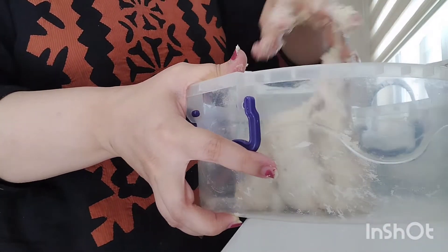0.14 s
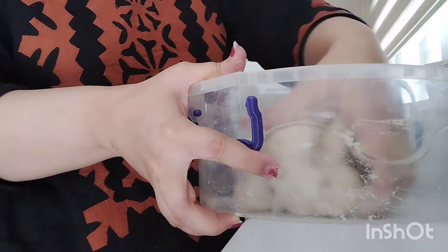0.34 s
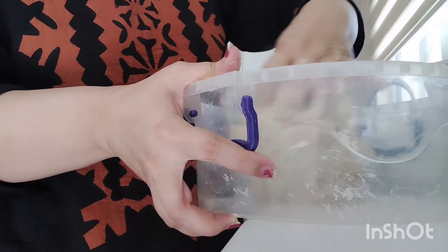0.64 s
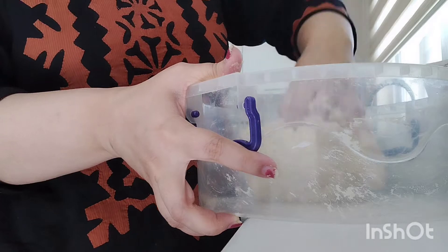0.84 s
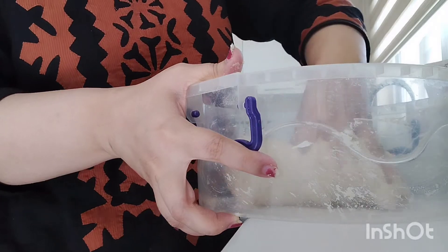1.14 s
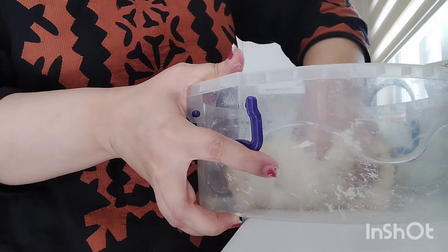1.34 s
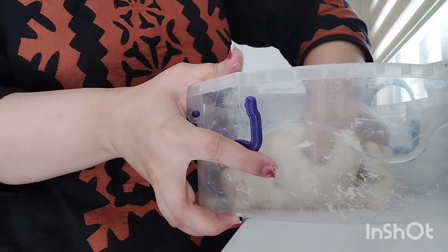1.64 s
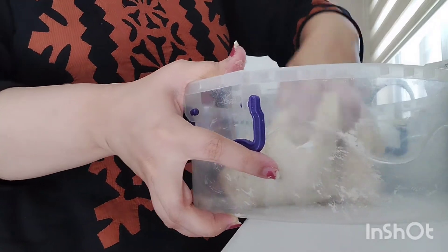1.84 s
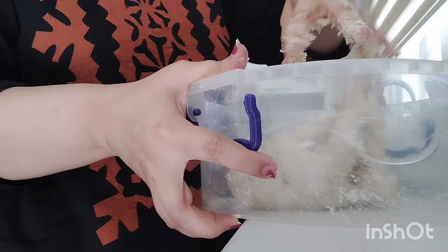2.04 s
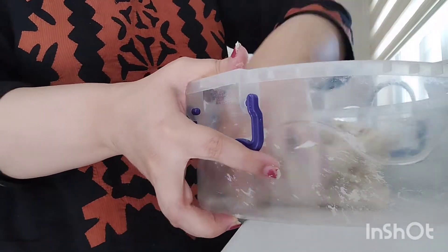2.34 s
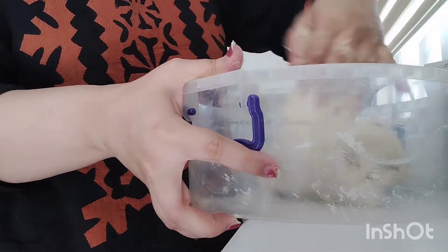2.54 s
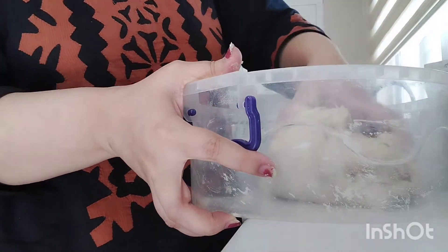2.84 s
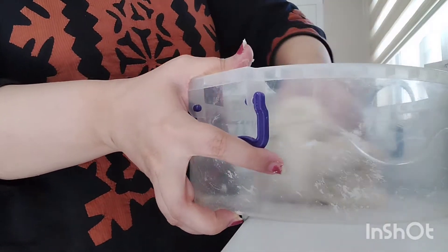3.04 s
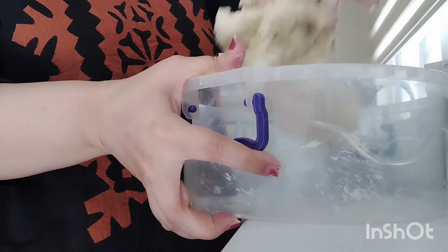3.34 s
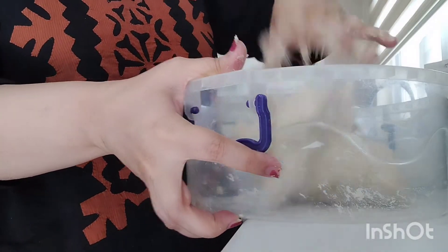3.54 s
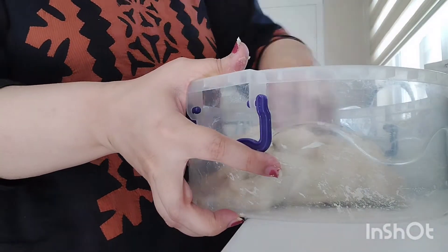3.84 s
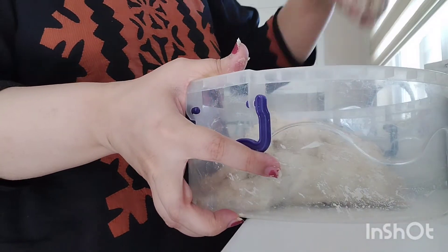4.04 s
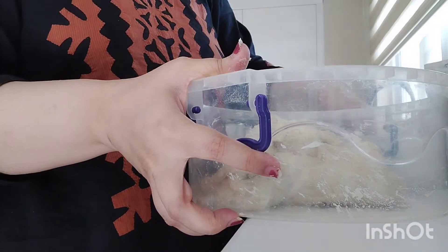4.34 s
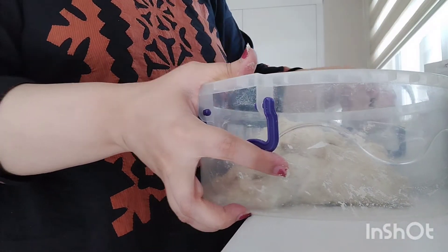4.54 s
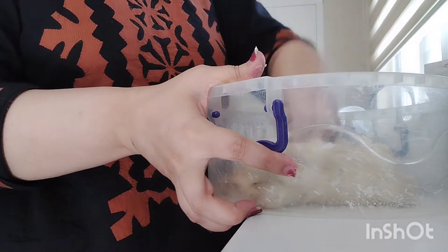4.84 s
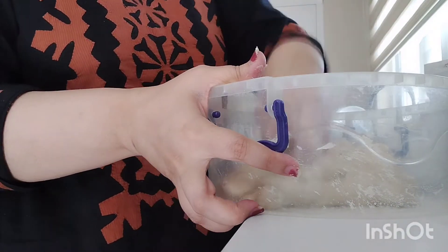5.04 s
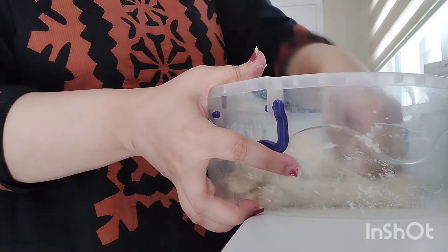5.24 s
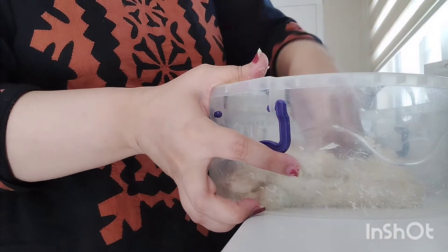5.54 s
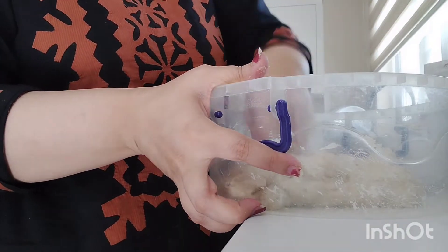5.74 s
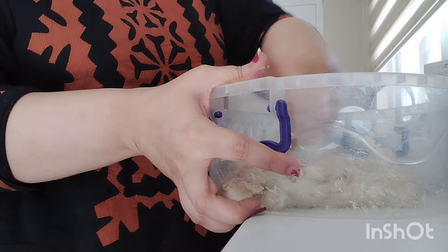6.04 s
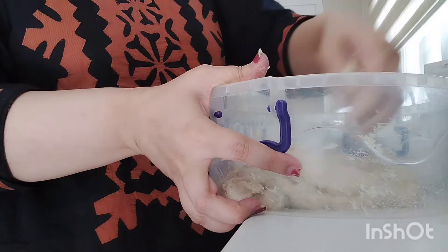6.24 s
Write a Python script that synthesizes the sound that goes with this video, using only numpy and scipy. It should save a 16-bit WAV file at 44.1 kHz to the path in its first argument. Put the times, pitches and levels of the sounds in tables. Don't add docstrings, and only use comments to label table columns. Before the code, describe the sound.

A steady low fan hum with a quick, soft shaft throb runs throughout, close in a small hard kitchen. Dough rubs thin plastic at the start, with light knocks at 0.1 s and a firm hollow knock at 0.37 s, followed by soft settling bumps. From 0.8 to 1.8 s it is quieter: faint thin air whistles and a tiny wet squeak at 1.1 s. Drags return at 1.9 s, and the loudest sharp plastic whack lands at 2.26 s. A pop at 2.9 s leads to a tight burst of knocks and rubbing around 3.2-3.6 s. After a lull, a dull bump comes at 4.3 s and a rub at 4.6 s. From 4.8 s gritty floury scuffs flicker, a low rocking rumble rises around 4.9 s, and knocks with bright pops strike at 5.4 s. Lighter taps at 5.8, 6.0 and 6.35 s continue to the end.

```python
import sys
import numpy as np
from scipy import signal
from scipy.fft import rfft, irfft
from scipy.io import wavfile
from scipy.ndimage import uniform_filter1d

SR = 44100
rng = np.random.default_rng(int(sys.argv[2]) if len(sys.argv) > 2 else 0)


def int16_out(signal):
    q = np.round(np.clip(np.atleast_2d(signal).T, -1, 1) * 32767)
    wavfile.write(sys.argv[1], SR, q.astype(np.int16))


def how_loud(loudness_db):
    steps = np.asarray(loudness_db, float) / 20
    return 10 ** steps


N = 281799


def along(table, hz):
    f, v = np.transpose(table)
    return np.interp(np.log(np.maximum(hz, 1)), np.log(f), v)


def unit(x):
    return x / np.sqrt(np.mean(x ** 2))


def peak(x):
    return x / np.max(np.abs(x))


def band(x, low_hz, high_hz):
    edges = [low_hz, min(high_hz, 0.45 * SR)]
    return signal.sosfilt(signal.butter(2, edges, "bandpass", fs=SR, output="sos"), x)


def colour(x, table):
    hz = np.fft.rfftfreq(len(x), 1 / SR)
    return irfft(rfft(x) * how_loud(along(table, hz)), len(x))


def walk(rate):
    k = int(SR / rate)
    steps = np.repeat(rng.standard_normal(N // k + 1), k)
    return 2.0 * uniform_filter1d(uniform_filter1d(steps, k), k)[:N]


def held_noise(t, hold):
    return np.repeat(rng.standard_normal(len(t) // hold + 1), hold)[:len(t)]


def decay(t, t60_s):
    return np.exp(-np.log(1000) * t / t60_s)


def ring(modes, t, gains=1, detune=1):
    hz, db, t60_s = np.transpose(modes)[:, :, None]
    tones = np.sin(2 * np.pi * hz * detune * t) * decay(t, t60_s)
    return np.sum(gains * how_loud(db) * tones, axis=0)


def add(out, s, x, pan_db):
    i = int(s * SR)
    x = x[..., :N - i]
    out[:, i:i + x.shape[-1]] += x * how_loud(np.array([[pan_db], [-pan_db]]) / 2)


# (pitch [Hz], level [dB per Hz])
FAN_AIR = [(13, -38), (22, -2), (31, -9.5), (44, -8.5), (82, -7), (184, -23.5), (263, -22.5), (294, -16),
           (328, -25), (376, -20), (585, -30.5), (861, -30), (2320, -54), (6600, -64), (7900, -69.5),
           (11200, -69.5), (13500, -61.5), (15500, -59.5)]
# (pitch [Hz], likeness [0-1])
FAN_ALIKE = [(60, 1), (150, 0.78), (400, 0.9), (1000, 0), (3000, 0), (9000, 0)]
# (pitch [Hz], left minus right [dB])
FAN_BALANCE = [(30, -3), (125, -0.5), (500, -3.5), (2000, -3.5), (8000, -3), (14000, 4)]


def fan():
    level_db, shaft_hz, shaft_db = -36.5, 16.65, -35
    t, hz = np.arange(N) / SR, np.fft.rfftfreq(N, 1 / SR)
    mid, side = rfft(rng.standard_normal((2, N))) * how_loud(along(FAN_AIR, hz))
    alike = np.clip(along(FAN_ALIKE, hz), 0, 1)
    pan = how_loud(along(FAN_BALANCE, hz) / 2)
    left = (np.sqrt(1 + alike) * mid + np.sqrt(1 - alike) * side) * pan
    right = (np.sqrt(1 + alike) * mid - np.sqrt(1 - alike) * side) / pan
    air = irfft(np.array([left, right]), N)

    top = np.array([colour(v, [(7000, -60), (8000, 8)]) for v in air])
    breath_db = 0.25 * walk(2.73) + 0.5 * walk(18.0)
    air = air + top * (how_loud(breath_db) - 1)
    air = air / np.std(air.mean(axis=0)) * how_loud(level_db + 0.42 * walk(2.77))

    turn = 2 * np.pi * shaft_hz * t - 0.2 + 0.15 * walk(1.5)
    throb = np.sqrt(2) * how_loud(shaft_db + 1.0 * walk(1.3)) * np.cos(turn)
    low_hz, high_hz = 62, 105
    edges = [(low_hz / 0.89, -60), (low_hz, 0), (high_hz, 0), (high_hz * 1.75, -60)]
    bass = colour(air.mean(axis=0), edges)
    swell = unit(how_loud(5.5 * np.cos(turn + 1.0)))
    return air + bass * (swell - 1) + throb


# (pitch [Hz], level [dB], fade by 60 dB [s])
TUB = [(345, -2.5, 0.059), (460, 1.5, 0.031), (595, 2, 0.025), (669, 2.5, 0.013), (870, -6.5, 0.039),
       (1055, 4.5, 0.021), (1308, 1, 0.01), (1560, -31, 0.039), (1713, -26, 0.066), (2302, -15, 0.033),
       (2970, -25.5, 0.019), (3600, -37, 0.14), (4200, -33.5, 0.075), (5360, -43, 0.0074)]
# (pitch [Hz], level [dB per Hz])
RUSTLE = [(300, 2), (1500, 15.5), (2300, 8.5), (4000, 0), (6500, -5.5), (8000, -13.5), (11000, -15),
          (13500, -8), (16000, -20)]
# (middle time [s], level [dB], half length [s], dryness [dB])
STROKES = [(0.06, -42, 0.093, -0.5), (0.597, -48, 0.29, 0.5), (0.93, -53, 0.4, -3.5), (1.45, -65, 0.26, 3),
           (1.868, -43, 0.17, -2.5), (2.3, -44, 0.036, -2), (2.414, -39, 0.12, -1), (2.683, -50.5, 0.5, 0),
           (3.205, -41, 0.2, -1.5), (3.314, -34, 0.11, -6), (3.592, -35.5, 0.064, -1.5),
           (4.572, -37.5, 0.1, 0), (4.942, -51.5, 0.23, -3), (5.408, -42.5, 0.094, -0.5),
           (5.962, -50.5, 0.82, 1.5), (6.38, -49.5, 0.064, 7)]


def drag():
    rest_db, rustle_db = -88, -14
    t = np.arange(N) / SR
    pull, rub = how_loud(rest_db), how_loud(rest_db)
    for s, db, half_s, dry_db in STROKES:
        stroke = how_loud(db) * np.exp(-((t - s) / half_s) ** 2)
        pull = pull + stroke
        rub = rub + stroke * how_loud(dry_db)
    grain_db = 4.4 * np.minimum(rng.exponential(size=N), 6.0) + 1.6 * walk(70)
    grains = rng.standard_normal((2, N)) * how_loud(grain_db)
    walls = unit(signal.fftconvolve(grains[0], ring(TUB, t[:SR // 10]))[:N]) * how_loud(-8.5)
    dry = np.array([unit(colour(grains[0] + k * 0.56 * grains[1], RUSTLE)) for k in (1, -1)])
    return pull * walls * how_loud(np.array([[-1.5], [1.5]])) + rub * dry * how_loud(rustle_db)


# (pitch [Hz], level [dB], fade by 60 dB [s])
COUNTER = [(47.3, -6, 0.068), (95.6, 9, 0.037), (132.1, -11, 0.14), (183, 0.5, 0.033)]
# (pitch [Hz], level [dB per Hz])
CRACK = [(300, -33), (1500, 15.5), (2300, 13.5), (4000, 2), (6500, -2), (8000, -26), (11000, -31),
         (13500, -22), (16000, -32)]
# (pitch [Hz], left minus right [dB])
WALL_BALANCE = [(400, 1.5), (620, -10.5), (1050, -2)]


def blow(out, s, db, spot_hz, crack_db, thud_db, push_s):
    detune = 0.012
    t, hz = np.arange(SR // 5) / SR, np.array(TUB)[:, :1]
    chance = rng.standard_normal((3, len(TUB), 1))
    hiss = rng.standard_normal((2, len(t)))
    shift = 1 + detune * chance[1]

    far_db = -12.0 * np.abs(np.log2(hz / spot_hz)) * (hz < 1500)
    sign = np.sign(chance[2] + 0.53 + 9 * (hz < 1200))
    near = how_loud(far_db + 2.15 * chance[0]) * sign

    push = np.hanning(int(push_s * SR) + 3)
    balance_db = along(WALL_BALANCE, hz) / 2
    sides = [ring(TUB, t, near * (hz < 1500) * how_loud(k * balance_db), shift) for k in (1, -1)]
    pushed = np.array([np.convolve(v, push)[:len(t)] for v in sides])
    low = -band(pushed, spot_hz / 2.0, 5000)
    low = low / np.max(np.abs(low.mean(axis=0)))
    high = peak(ring(TUB, t, near * (hz > 1500), shift))

    grit = how_loud(6.9 * held_noise(t, 64))
    crack_shape = np.exp(-t / 0.0019) + 0.076 * grit * np.exp(-t / 0.014)
    crack_shape = crack_shape * np.minimum(t / push_s, 1)
    crack = peak(np.array([colour(v, CRACK) for v in hiss]) * crack_shape)

    shaking = hiss[0] * grit * (1 - np.exp(-t / 0.0032)) * np.exp(-t / 0.0022)
    wobble = peak(signal.fftconvolve(shaking, low.mean(axis=0))[:len(t)])
    wobble = wobble * how_loud(along(WALL_BALANCE, spot_hz) * np.array([[0.5], [-0.5]]))
    thud = peak(ring(COUNTER, t) * (1 - np.exp(-t / 0.012)))

    add(out, s - 0.0005, how_loud(db) * (low + 600 * push_s * wobble), 0)
    add(out, s - 0.0005, how_loud(db + crack_db) * (0.69 * high + 2.37 * crack), -4.5)
    add(out, s + 0.003, how_loud(db + thud_db + 7.0) * thud, -5.5)


# (time [s], peak level [dB], strongest wall tone [Hz], crack re ring [dB], counter thud re ring [dB])
BLOWS = [(0.0955, -21.5, 445, -21, -4), (0.157, -27, 626, -14.5, -31), (0.367, -12.5, 660, -11, -10),
         (1.884, -26.5, 384, -20.5, -4), (2.26, -3.5, 900, -21, -19.5), (2.936, -27.5, 595, -18.5, -25),
         (3.281, -28.5, 1200, -12, 1), (3.3051, -10.5, 527, -15.5, -16), (3.3217, -14, 790, -11, -12.5),
         (3.362, -21, 500, -30, -19), (3.51, -30, 474, -5, -34), (3.513, -33, 1080, -17, -31),
         (3.556, -29.5, 325, -5, 1), (3.601, -30.5, 800, -13, -6), (4.335, -31.5, 546, -38, 0.5),
         (5.398, -21, 960, -13, -10.5), (5.823, -23.5, 497, -27, -8.5), (6.035, -26.5, 1050, -19, 1.5),
         (6.098, -30.5, 1010, -14.5, -5), (6.345, -27.5, 860, -19, -8)]
# (time [s], peak level [dB], strongest wall tone [Hz], crack re ring [dB])
BUMPS = [(0.403, -32, 533, -21), (0.42, -39, 600, -30), (0.445, -29, 564, -32), (0.345, -36, 500, -22),
         (0.357, -40, 500, -11), (0.594, -32, 870, -45), (0.622, -32.5, 307, -35), (0.71, -34.5, 424, -21),
         (0.797, -39, 594, -23), (1.991, -31.5, 605, -22), (2.0226, -31.5, 600, -19), (2.3, -27, 600, -16),
         (2.331, -27.5, 640, -20), (2.338, -26.5, 800, -23), (2.342, -25.5, 935, -26),
         (2.409, -38, 600, -16), (2.466, -34, 603, -18), (2.29, -26, 400, -19), (2.263, -16.5, 1180, -30),
         (2.414, -48, 330, -37), (2.431, -36, 1050, -30), (2.515, -45, 420, -7), (3.184, -32, 960, -20),
         (3.167, -32, 870, -21), (3.178, -29, 450, -34), (3.261, -27, 385, -27), (3.377, -29, 1040, -23),
         (3.562, -27.5, 323, -17), (3.61, -27, 330, -25), (5.153, -33, 303, -22), (5.389, -23, 366, -45),
         (5.372, -34, 900, -14), (5.815, -28, 420, -40), (6.03, -30.5, 400, -37), (0.1, -53, 300, -27),
         (0.37, -19.5, 1120, -34), (3.299, -35.5, 350, 1), (5.404, -22.5, 900, -24), (5.411, -27, 990, -20),
         (5.422, -39, 1000, -24), (2.247, -25.5, 820, -30), (6.042, -34, 1000, -23), (0.385, -54, 590, -22)]
# (time [s], peak level [dB])
TICKS = [(0.346, -39), (1.305, -43.5), (1.521, -41.5), (1.918, -44), (3.313, -20.5), (3.33, -27),
         (3.34, -26.5), (3.376, -40), (3.353, -39), (4.318, -46.5), (5.2539, -33.5), (5.72, -49)]


def knocks():
    out = np.zeros((2, N))
    hard_push_s, soft_push_s = 0.0005, 0.00084
    for row in BLOWS:
        blow(out, *row, hard_push_s)
    for row in BUMPS:
        blow(out, *row, thud_db=-15.5, push_s=soft_push_s)
    for s, db in TICKS:
        blow(out, s, db, spot_hz=900, crack_db=-9, thud_db=-23, push_s=hard_push_s)
    return out


# (time [s], peak level [dB], pitch [Hz], fade by 60 dB [s])
POPS = [(0.143, -52, 4000, .02), (0.355, -50, 13800, .01), (0.434, -53, 5600, .015),
        (0.484, -54, 5600, .01), (0.484, -56, 12500, .01), (0.641, -51, 3730, .05), (0.66, -58, 3850, .04),
        (0.652, -49, 2100, .03), (0.727, -60, 2780, .03), (0.797, -55, 4670, .03),
        (1.742, -51, 3130, 0.026), (1.757, -59, 4900, .02), (2.042, -51, 2280, .02), (2.79, -61, 6000, .03),
        (2.925, -36.5, 2000, 0.057), (3.046, -53, 3450, .02), (3.058, -50, 2340, 0.016),
        (3.07, -56, 5500, .02), (3.148, -50, 2280, 0.033), (3.15, -57, 2900, .03), (3.179, -45, 2180, .03),
        (3.181, -55, 3600, .02), (3.236, -50, 2300, .03), (3.262, -50, 2300, .03), (3.51, -53, 9000, .02),
        (3.511, -52, 13400, .02), (3.305, -48, 13500, .015), (5.153, -55, 3600, 0.038),
        (5.258, -43, 3440, .04), (5.376, -33, 4200, 0.056), (5.4, -37, 5600, 0.033),
        (4.853, -50, 2180, .03), (0.367, -29.5, 3870, 0.0084), (0.395, -48, 3300, .04),
        (5.399, -33.5, 1960, 0.024), (5.722, -37, 2080, 0.037), (3.327, -29, 1980, 0.022),
        (6.371, -50, 2300, .03), (6.385, -55, 9000, .02), (4.26, -55, 3300, .03), (4.538, -52, 3300, .04),
        (4.6, -53, 4100, 0.096)]


def pops():
    out, t = np.zeros((2, N)), np.arange(SR // 10) / SR
    for s, db, hz, t60_s in POPS:
        noise = band(rng.standard_normal((2, len(t))), hz / 1.14, hz * 1.11)
        burst = noise * np.minimum(t / 0.00073, 1) * decay(t, t60_s)
        pair = burst[0] + 0.69 * burst[1] * np.array([[1], [-1]])
        add(out, s - 0.001, how_loud(db) * peak(pair), -3.0)
    return out


# (start time [s], length [s], level [dB], start pitch [Hz], end pitch [Hz])
HISSES = [
    (0.79, 0.27, -70, 4750, 4470),
    (1.498, 0.34, -75, 4800, 4900),
]


def hisses():
    t, out = np.arange(N) / SR, 0
    for s, length_s, db, from_hz, to_hz in HISSES:
        press = np.clip((t - s) / length_s, 0, 1)
        smear = unit(band(rng.standard_normal(N), 5, 150)) * how_loud(db + 2.0 * walk(28.7))
        glide_hz = from_hz + (to_hz - from_hz) * press
        whistle = np.sin(2 * np.pi * np.cumsum(glide_hz) / SR)
        out = out + smear * np.abs(np.sin(np.pi * press)) * whistle
    return out


# (pitch [Hz], width [Hz], level [dB])
SQUEAK = [(3600, 2200, 5.5), (4400, 500, 2), (5250, 300, 10), (6030, 300, 6), (5600, 1600, -1.5),
          (10300, 2400, 0), (12000, 460, 5), (13100, 700, -1)]


def squeak():
    start_s, level_db, hold_s = 1.122, -62, 0.065
    out, t = np.zeros((2, N)), np.arange(SR // 5) / SR
    rasp = rng.standard_normal((2, len(t))) * how_loud(4.0 * held_noise(t, 120))
    tone = 0
    for hz, width_hz, db in SQUEAK:
        tone = tone + how_loud(db) * unit(band(rasp, hz - width_hz / 2, hz + width_hz / 2))
    shape = np.minimum(t / 0.025, 1) * np.exp(-(t / hold_s) ** 2)
    add(out, start_s, how_loud(level_db) * tone * shape, -1.5)
    return out


# (time [s], peak level [dB], centre pitch [Hz], sheen re peak [dB], held [s])
SCUFFS = [(1.5994, -67, 2410, 7, 0.009), (1.798, -66, 2370, 8, 0.025), (1.835, -51, 5030, -6, 0.014),
          (1.871, -59, 3000, -1, 0.058), (2.2449, -39, 3030, -24, 0.017), (2.2575, -34, 5600, -3, 0.0038),
          (3.3182, -29.5, 6150, -17, 0.0034), (4.836, -42.5, 2640, -8.5, 0.028),
          (4.889, -51.5, 5940, -3, 0.017), (4.927, -45.5, 3300, -8, 0.0093),
          (5.049, -45.5, 3920, 6.5, 0.0072), (5.073, -55, 5270, 3, 0.019),
          (5.243, -42.5, 3400, -2.5, 0.021), (5.367, -40, 4150, -4, 0.023), (5.478, -48, 5270, -3, 0.014),
          (5.583, -57.5, 3900, 3, 0.039), (5.687, -49, 5960, -3, 0.01), (5.718, -40, 5500, -15, 0.012),
          (5.741, -60, 4900, -13, 0.038), (5.792, -47.5, 5800, 4, 0.024), (5.899, -49.5, 5630, 1, 0.028),
          (5.952, -58, 5770, -6, 0.0073), (6.015, -55, 5000, 6, 0.013), (6.095, -48, 2670, -4, 0.012)]


def scuffs():
    rise_s, stop_s, trail_s, trail = 0.00096, 0.0039, 0.038, 0.16
    out, t = np.zeros((2, N)), np.arange(SR // 6) / SR
    for s, db, hz, sheen_db, held_s in SCUFFS:
        mid, side = rng.standard_normal((2, len(t))) * how_loud(3.5 * held_noise(t, 90))
        hiss = np.array([mid + 2.64 * side, mid - 0.48 * side])
        stop = np.exp(-np.maximum(t - held_s, 0) / stop_s)
        shape = np.minimum(t / rise_s, 1) * (stop + trail * np.exp(-t / trail_s))
        body = unit(band(hiss, hz / 1.15, hz * 1.07)) + 2.0 * unit(band(hiss, 2230, 5600))
        sheen = unit(band(hiss, 11600, 16800)) + 0.32 * unit(band(hiss, 5000, 6600))
        add(out, s, how_loud(db - 14.5) * shape * body, -14.5)
        add(out, s, how_loud(db - 8.5 + sheen_db) * shape * sheen, 0)
    return out


# (pitch [Hz], level [dB], fade by 60 dB [s])
SWAY = [(39, 9, 0.11), (85, -2, 0.16), (132, -14, 0.075)]


def rock():
    start_s, level_db, rise_s = 4.91, -42.5, 0.06
    t = np.arange(N) / SR
    rumble = unit(signal.fftconvolve(rng.standard_normal(N), ring(SWAY, t[:SR // 5]))[:N])
    lean = 1 / (1 + np.exp((start_s - t) / rise_s))
    return how_loud(level_db + 2.0 * walk(4.3)) * rumble * lean


def room(x):
    t60_s, level_db, dull_hz = 0.32, -18.5, 2430
    t = np.arange(SR // 2) / SR
    tail = rng.standard_normal((2, len(t))) * decay(t, t60_s) * (t > 0.004)
    tail = signal.sosfilt(signal.butter(1, dull_hz, fs=SR, output="sos"), tail)
    tail /= np.sqrt(np.sum(tail ** 2, axis=1, keepdims=True))
    return how_loud(level_db) * signal.fftconvolve(x.mean(axis=0)[None], tail, axes=1)[:, :N]


def scene():
    hands = drag() + knocks() + pops() + hisses() + squeak() + scuffs()
    return fan() + hands + room(hands) + rock()


def top_cut(x):
    return signal.sosfilt(signal.butter(12, 15800, fs=SR, output="sos"), x)


def record(dry):
    mix = signal.sosfilt(signal.ellip(10, 0.2, 60, 15800, fs=SR, output="sos"), dry)
    return top_cut(mix)


dry = scene()
out = record(dry)
int16_out(out)
```